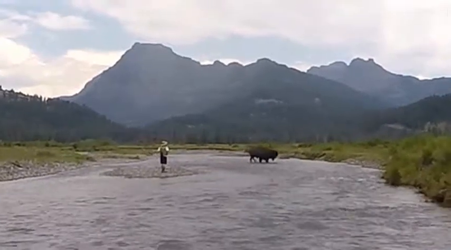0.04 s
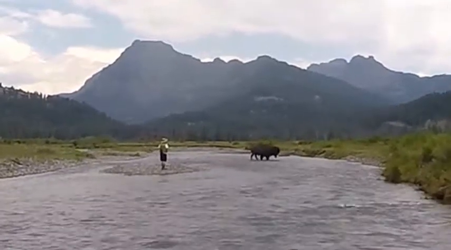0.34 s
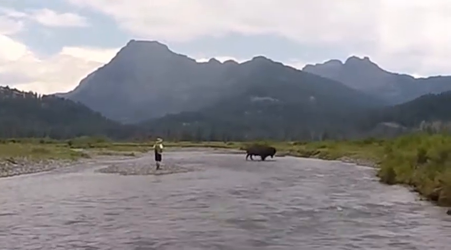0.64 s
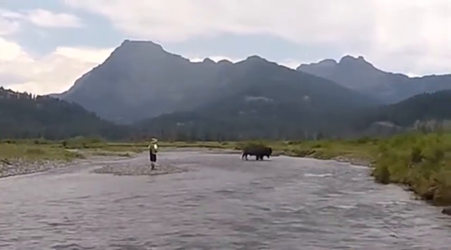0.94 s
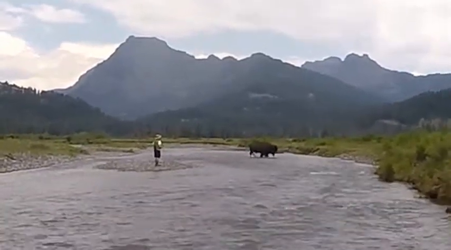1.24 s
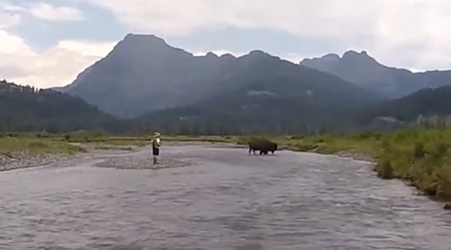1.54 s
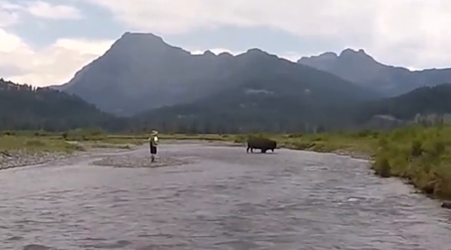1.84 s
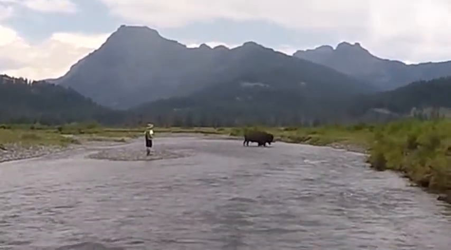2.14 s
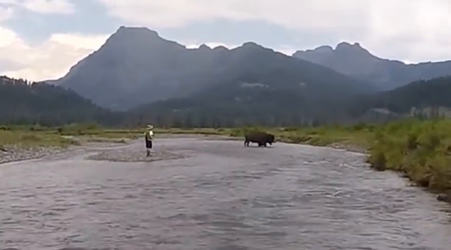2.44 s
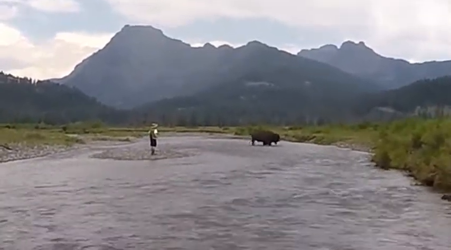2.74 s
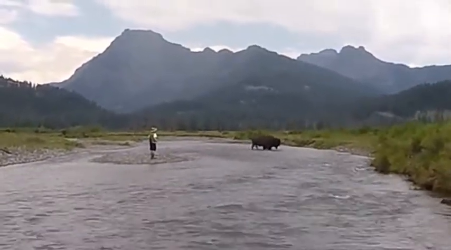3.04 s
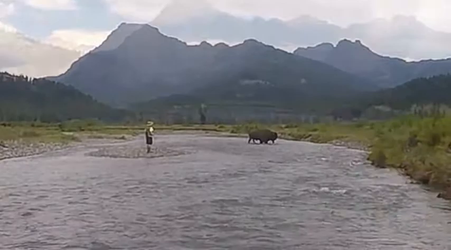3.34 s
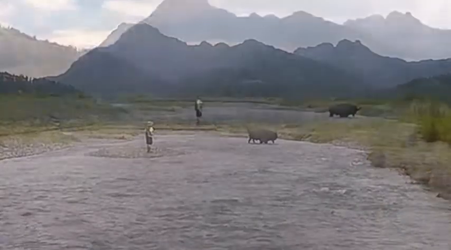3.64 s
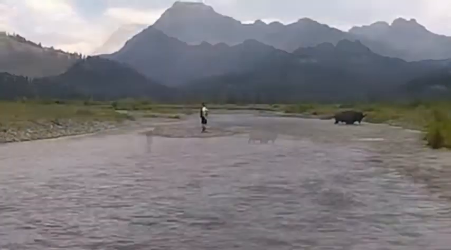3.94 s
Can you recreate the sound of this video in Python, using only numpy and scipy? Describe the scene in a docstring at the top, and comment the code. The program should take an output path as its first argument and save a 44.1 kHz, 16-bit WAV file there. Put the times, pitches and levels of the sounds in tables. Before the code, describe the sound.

A handled microphone gives soft cloth brushes, small creaks and ticks, then one loud, cracking thump. Faint wind rumble and a dull river rush lie behind it outdoors, dropping out after the knock and creeping back.

```python
"""River, wind and a knocked camera.

A shallow river and light wind, heard dully through the housing of a hand-held camera.
A sleeve brushes it, the mount creaks and the plastic ticks; then a knock shoves the housing
and it snaps back with a crack. The sound cuts out, and river and wind slowly fade in again."""
import sys
import numpy as np
from scipy import signal
from scipy.fft import rfft, irfft
from scipy.io import wavfile
from scipy.ndimage import uniform_filter1d

SR = 44100
rng = np.random.default_rng(int(sys.argv[2]) if len(sys.argv) > 2 else 0)


def digitize_waveform(pressure):
    """Quantize a signal to 16-bit integers and store it at the path in sys.argv[1].

    Rows of a 2-D input are taken as channels; values are limited to [-1, 1].
    """
    field = np.atleast_2d(pressure).T
    bounded = np.clip(field, -1, 1)
    quanta = np.round(bounded * 32767).astype(np.int16)
    wavfile.write(sys.argv[1], SR, quanta)


N = 176400
TIME = np.arange(N) / SR
CUT_S = 3.2566


def amp(db):
    """Decibels to gain."""
    return 10 ** (np.asarray(db) / 20)


def unit_rms(x):
    """Scales to rms 1."""
    return x / np.sqrt(np.mean(x ** 2) + 1e-20)


def spectrum_db(spectrum, hz):
    """Interpolates a spectrum on a log-frequency axis."""
    points_hz, points_db = np.transpose(spectrum)
    return np.interp(np.log(hz + 1), np.log(points_hz + 1), points_db)


def add(mix, start_s, sound):
    """Mixes a sound in at its start time."""
    part = mix[round(start_s * SR):][:len(sound)]
    part += sound[:len(part)]


def drifting_noise(spectrum, swell_db, patch_db, fft_size):
    """Coloured noise with a slow overall swell and small drifting patches in its spectrum."""
    hop = fft_size // 4
    hz = np.fft.rfftfreq(fft_size, 1 / SR)
    real, imag, patches = rng.standard_normal((3, N // hop + 5, len(hz)))
    patches = uniform_filter1d(patches, size=8, axis=0)
    patches = unit_rms(uniform_filter1d(patches, size=8, axis=1))
    swell = unit_rms(uniform_filter1d(rng.standard_normal(len(real)), size=SR // 4 // hop))
    level_db = spectrum_db(spectrum, hz) + patch_db * patches + swell_db * swell[:, None]
    frames = (real + 1j * imag) * amp(level_db)
    _, noise = signal.istft(frames.T, nperseg=fft_size, noverlap=fft_size - hop)
    return unit_rms(noise[:N])


def strike(modes, rise_s, peak_db, tilt_db_per_oct=0):
    """A brief contact rings damped modes of alternating sign; the tilt makes it brighter or duller."""
    t = np.arange(SR // 20) / SR
    ring = np.zeros(len(t))
    for k, (hz, db, t60_s) in enumerate(modes):
        envelope = amp(db + tilt_db_per_oct * np.log2(hz) - 60 * t / t60_s)
        ring += (-1) ** k * envelope * np.sin(2 * np.pi * hz * t)
    ring *= 1 - np.exp(-(t / rise_s) ** 2)
    return amp(peak_db) * ring / abs(ring).max()


def rub(length_s, colour_db, grain_db=2):
    """Grainy friction noise that swells and dies in one stroke; colour_db maps Hz to dB."""
    n = int(length_s * SR)
    grain = unit_rms(uniform_filter1d(rng.standard_normal(N), size=200))[:n]
    hiss = rng.standard_normal(N)[:n] * amp(grain_db * grain)
    hz = np.fft.rfftfreq(n, 1 / SR)
    hiss = irfft(rfft(hiss) * amp(colour_db(hz)), n)
    return unit_rms(hiss) * np.sin(np.pi * np.arange(n) / n)


def resonance(hz, centre_hz, width_hz):
    """A resonance-shaped hill of height 1."""
    return 1 / (1 + ((hz - centre_hz) / width_hz) ** 2)


# Wind rumble. Each row: frequency in Hz, relative density in dB.
WIND_SPECTRUM = [(10, -25.5), (22, -2), (36, 2.5), (52, -2.5), (72, -10), (110, -13.5), (160, -24.5),
                 (250, -30), (400, -40), (900, -68)]


def wind(level_db=-42.8, rise_db_per_s=.6, after_cut_db=-4.5):
    """A breeze buffets the housing, freshening slightly until the cut and weaker after it."""
    trend_db = np.where(TIME < CUT_S, rise_db_per_s * (TIME - CUT_S / 2), after_cut_db)
    rumble = drifting_noise(WIND_SPECTRUM, swell_db=.6, patch_db=1.8, fft_size=4096)
    return amp(level_db + trend_db) * rumble


# River rush. Each row: frequency in Hz, relative density in dB.
RIVER_SPECTRUM = [(100, 0.5), (400, 2.5), (800, 1), (1300, -3.5), (2400, -2), (3800, -6.5), (5500, -9.5),
                  (8000, -14), (12000, -16.5), (15500, -17.5)]


def river(level_db=-63):
    """Shallow water rushes evenly."""
    return amp(level_db) * drifting_noise(RIVER_SPECTRUM, swell_db=.25, patch_db=1.2, fft_size=1024)


# Friction on the housing. Each row: frequency in Hz, relative density in dB.
FRICTION_SPECTRUM = [(300, -28.5), (900, -2), (1350, -9), (1900, -5), (3600, -3), (4400, -8), (5100, -11),
                     (6700, -17.5), (8200, -29), (15000, -47)]
# Sleeve strokes. Each row: start in seconds, length in seconds, level in dB, bright peak in Hz.
SLEEVE_STROKES = [(0, 0.3, -65, 1870), (0.219, 0.23, -58, 3500), (0.481, 0.073, -61.5, 2010),
                  (0.557, 0.068, -57, 3580), (0.832, 0.043, -67, 3400), (0.938, 0.078, -63.5, 2300),
                  (1.036, 0.066, -60.5, 2600), (1.319, 0.28, -58.5, 2670), (2.984, 0.31, -63, 2000),
                  (3.221, 0.038, -47, 2110), (3.875, .18, -56.5, 2580)]


def sleeve(mid_stroke_hz=2890):
    """Cloth brushes the housing; the air inside rings hollow under every stroke."""
    def colour_db(hz, peak_hz):
        tilt_db_per_oct = 5 * np.log2(peak_hz / mid_stroke_hz)
        friction_db = spectrum_db(FRICTION_SPECTRUM, hz) + tilt_db_per_oct * np.log2(hz + 1)
        peak_db = 6.5 * resonance(hz, peak_hz, width_hz=300)
        hollow_db = 7 * resonance(hz, centre_hz=1920, width_hz=200)
        return friction_db + peak_db + hollow_db

    out = np.zeros(N)
    for start_s, length_s, level_db, peak_hz in SLEEVE_STROKES:
        add(out, start_s, amp(level_db) * rub(length_s, lambda hz: colour_db(hz, peak_hz)))
    return out


# Mount modes. Each row: frequency in Hz, relative level in dB, T60 in seconds.
MOUNT_MODES = [(400, -10, 0.0056), (781, 7.5, 0.0064), (950, -20, 0.0096), (2420, 4, 0.0033),
               (4640, -23, .002)]
# Creaks. Each row: start in seconds, peak in dB.
MOUNT_CREAKS = [(.049, -49.5), (0.107, -48), (.163, -49), (1.741, -51.5), (1.774, -48), (1.8409, -44.5),
                (1.9435, -38.5), (2.5105, -48.5), (2.583, -42.5), (2.608, -39.5), (2.9707, -32)]


def mount_creaks():
    """The mount creaks in short, dull rings with a soft onset."""
    out = np.zeros(N)
    for start_s, peak_db in MOUNT_CREAKS:
        add(out, start_s, strike(MOUNT_MODES, rise_s=.0019, peak_db=peak_db))
    return out


# Housing modes in a tick. Each row: frequency in Hz, relative level in dB, T60 in seconds.
TICK_MODES = [(864, -16, 0.015), (1485, -10, 0.016), (2220, -4, 0.0095), (2650, 5.5, 0.0086),
              (4480, -11, .004), (6100, -12, 0.0025), (8150, -33, .004)]
# Ticks. Each row: start in seconds, peak in dB, tilt in dB per octave.
HOUSING_TICKS = [(1.52, -31, 15), (2.163, -49, 3), (2.1755, -26.5, -5), (2.546, -51, -12)]


def housing_ticks(rise_s=.00027):
    """The plastic housing rings in sharp ticks."""
    out = np.zeros(N)
    for start_s, peak_db, tilt_db_per_oct in HOUSING_TICKS:
        add(out, start_s, strike(TICK_MODES, rise_s, peak_db, tilt_db_per_oct))
    return out


# Housing swings. Each row: start in seconds, signed gain, extra starting pitch in Hz,
# final pitch in Hz, decay in seconds.
KNOCK_SWINGS = [(3.2009, .92, 171, 44, .0133), (3.2254, -.46, 108, 26.5, .029)]
# Housing modes in the knock. Each row: frequency in Hz, relative level in dB, T60 in seconds.
KNOCK_MODES = [(520, -7, .0036), (1250, 2, .002), (2330, -3.5, .0057), (3600, -6.5, .0046),
               (4800, -22, .006), (6560, -19, 0.0054), (8240, -14.5, .003), (11070, -17, .0016)]
# Hard contacts. Each row: start in seconds, peak in dB, tilt in dB per octave.
KNOCK_CRACKS = [(3.2105, -32, 14), (3.2225, 4, -0.5), (3.22375, -17, 9.5)]


def knock(sag_s=.0019, swing_rise_s=.0007, crack_rise_s=.00011, scrape_db=-39):
    """A blow shoves the housing in and lets go: a soft touch, two deep swings, cracks and a scrape."""
    out = np.zeros(N)
    t = np.arange(SR // 10) / SR
    touch = strike(KNOCK_MODES, rise_s=.0008, peak_db=-19, tilt_db_per_oct=-5)
    add(out, start_s=3.1995, sound=touch)
    for start_s, gain, extra_hz, final_hz, decay_s in KNOCK_SWINGS:
        cycles = np.cumsum(final_hz + extra_hz * np.exp(-t / sag_s)) / SR
        envelope = (1 - np.exp(-t / swing_rise_s)) * np.exp(-t / decay_s)
        add(out, start_s, gain * envelope * np.sin(2 * np.pi * cycles))
    for start_s, peak_db, tilt_db_per_oct in KNOCK_CRACKS:
        add(out, start_s, -strike(KNOCK_MODES, crack_rise_s, peak_db, tilt_db_per_oct))
    # The housing slides under the blow: friction tilted up 1.5 dB per octave.
    scrape = rub(.027, lambda hz: spectrum_db(FRICTION_SPECTRUM, hz) + 1.5 * np.log2(hz + 1))
    add(out, start_s=3.205, sound=amp(scrape_db) * scrape)
    return out


# Wind and river after the cut. Each row: time in seconds, gain in dB.
OUTDOOR_FADE_IN = [(3.257, -20), (3.38, -19), (3.52, -11.5), (3.75, -7), (4.0, -2)]


def dropout_gain():
    """The level drops at the cut, then creeps back."""
    times_s, gains_db = np.transpose(OUTDOOR_FADE_IN)
    return np.where(TIME < CUT_S, 1, amp(np.interp(TIME, times_s, gains_db)))


def pop(gain_db=-48.5, rise_s=.0001, decay_s=.00055):
    """A tiny one-sided pulse in the hush."""
    t = TIME[:SR // 20]
    return amp(gain_db) * (1 - np.exp(-t / rise_s)) * np.exp(-t / decay_s)


def scene(cut_fall_s=.00008):
    """Handling sounds over wind and river; the cut ends the knock and ducks the outdoor sound."""
    outdoors = dropout_gain() * (wind() + river())
    handling = sleeve() + mount_creaks() + housing_ticks()
    knock_gate = np.exp(-np.maximum(TIME - CUT_S, 0) / cut_fall_s)
    mix = outdoors + handling + knock_gate * knock()
    add(mix, start_s=3.423, sound=pop())
    return mix[None]


def record(dry):
    """The loudest crack overloads the input; a low-pass limits the band."""
    ceiling, cutoff_hz = .97, 15600
    clipped = np.clip(dry, -ceiling, ceiling)
    lowpass = signal.firwin(511, cutoff_hz, window=("kaiser", 9), fs=SR)
    return signal.oaconvolve(clipped, lowpass[None], "same")


dry = scene()
out = record(dry)
digitize_waveform(out)
```